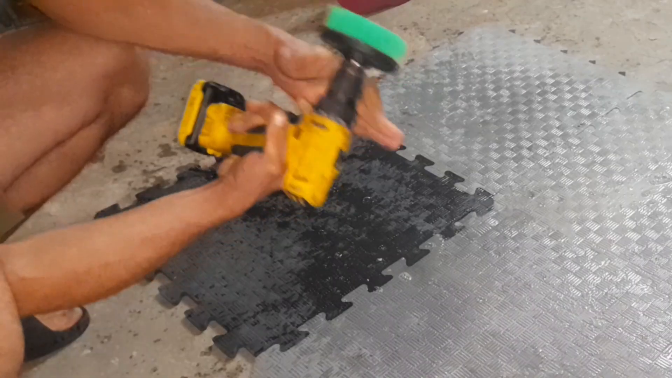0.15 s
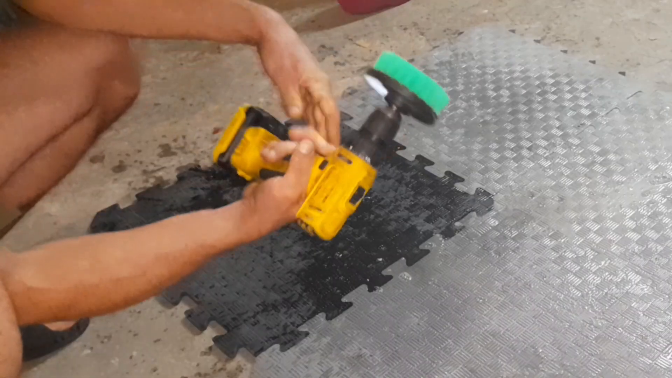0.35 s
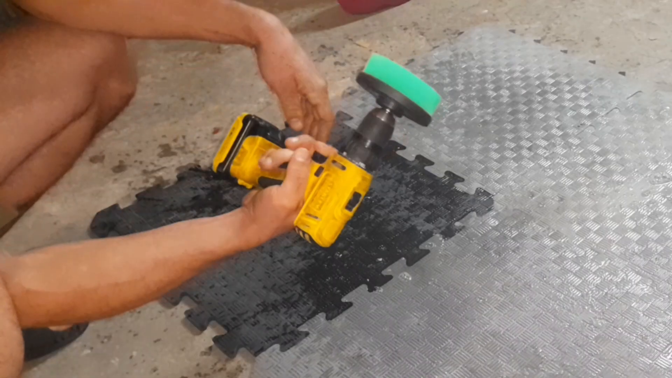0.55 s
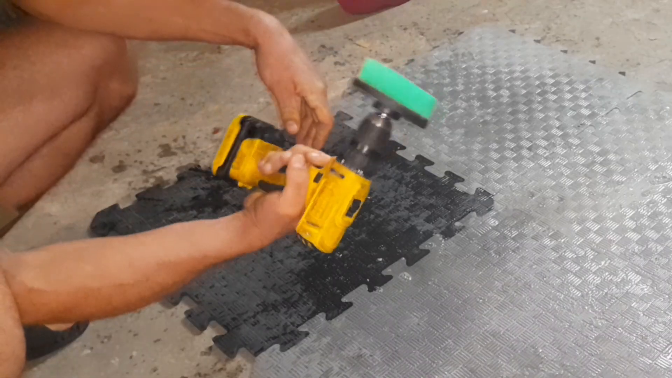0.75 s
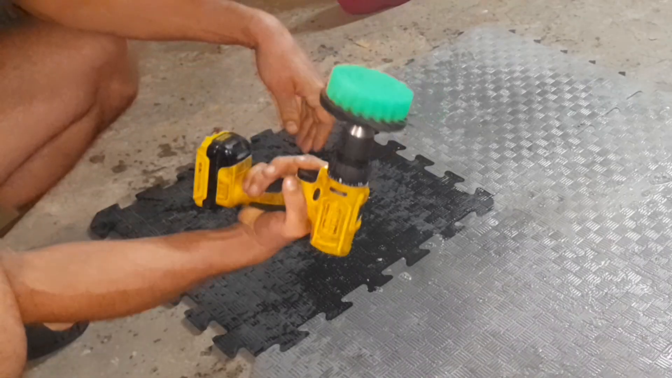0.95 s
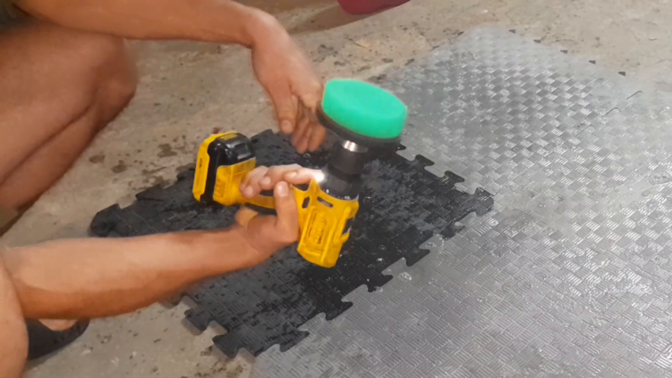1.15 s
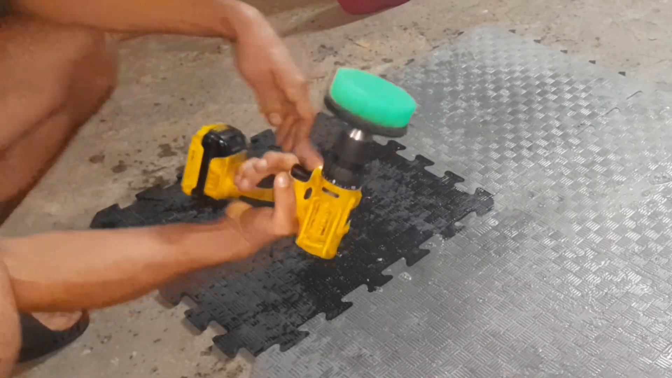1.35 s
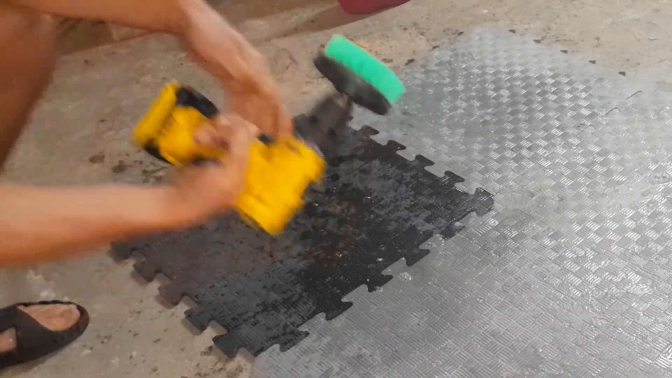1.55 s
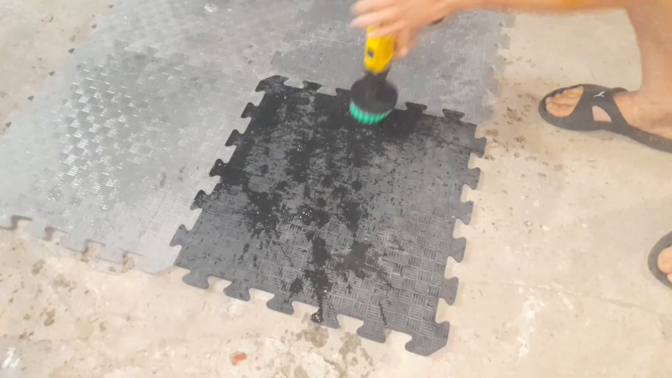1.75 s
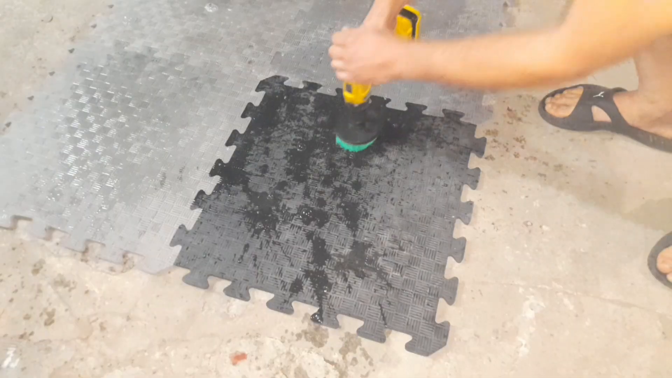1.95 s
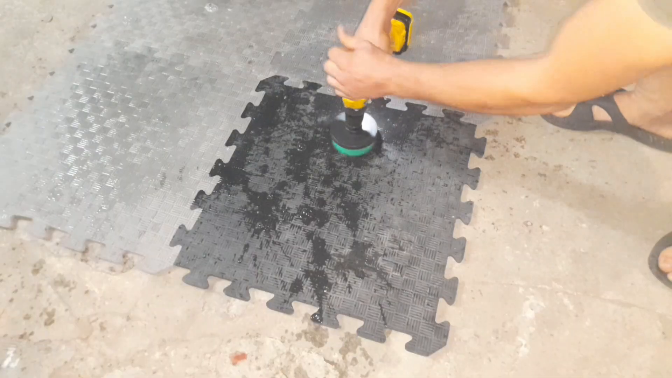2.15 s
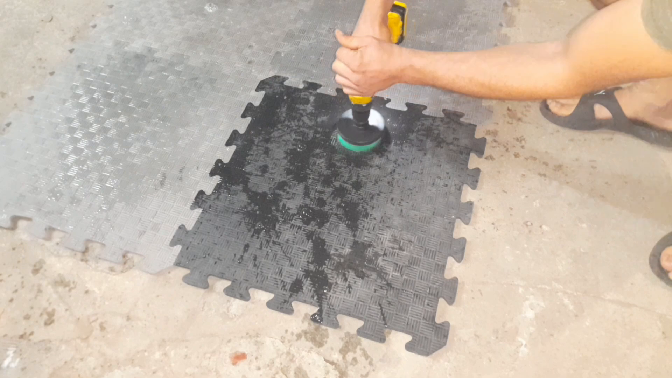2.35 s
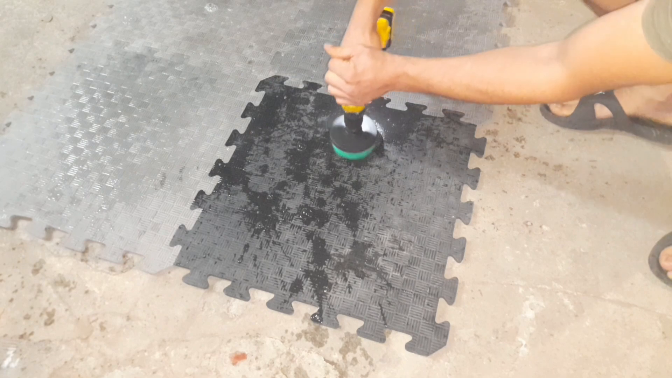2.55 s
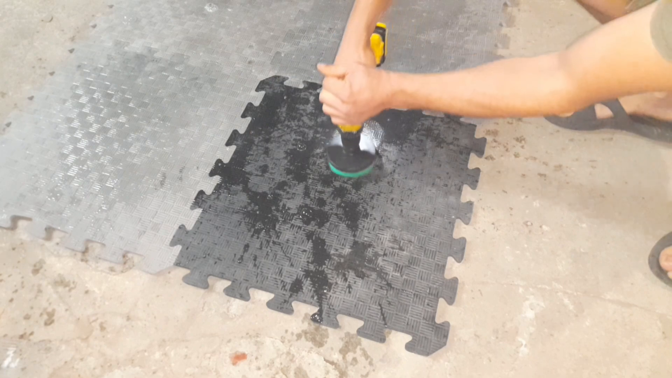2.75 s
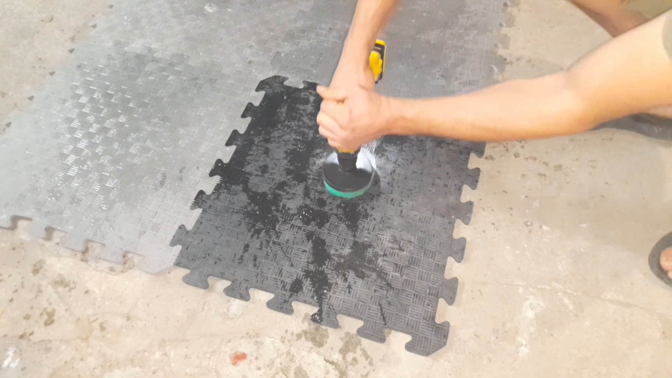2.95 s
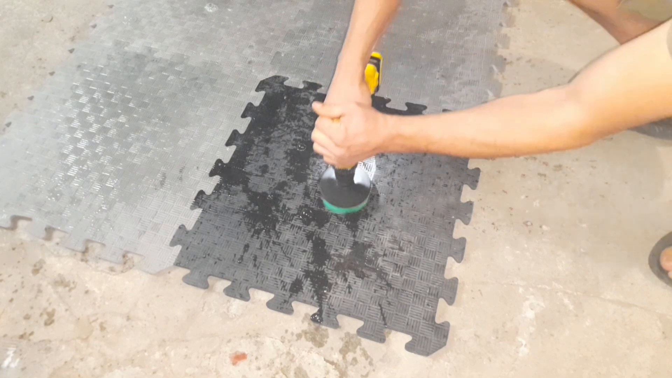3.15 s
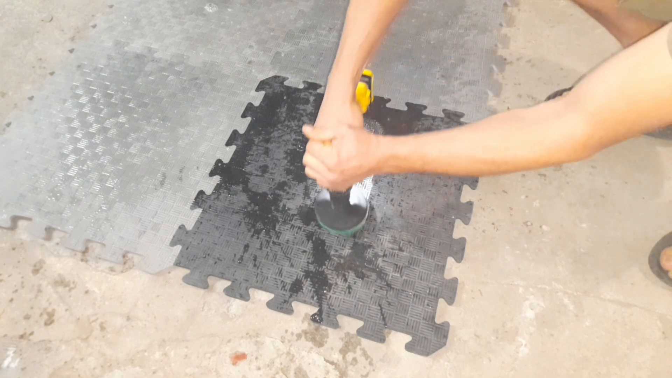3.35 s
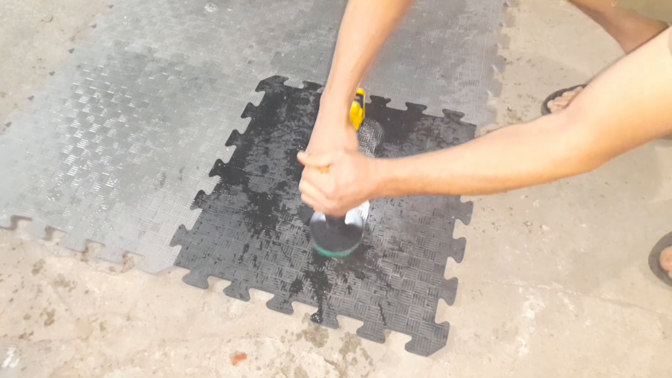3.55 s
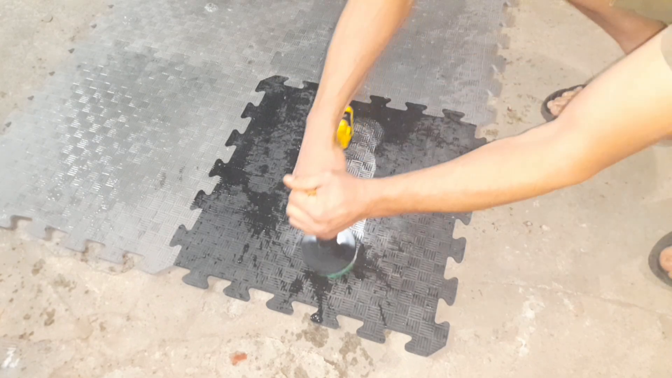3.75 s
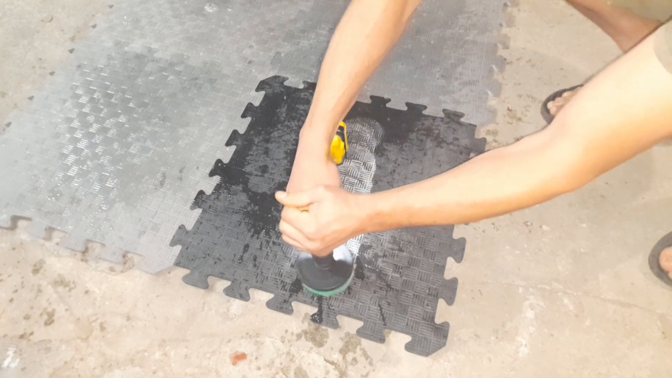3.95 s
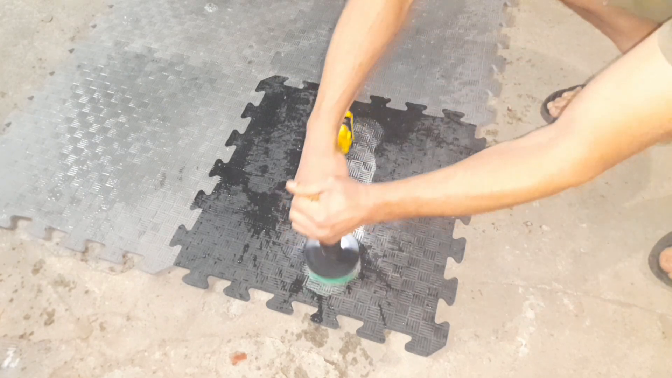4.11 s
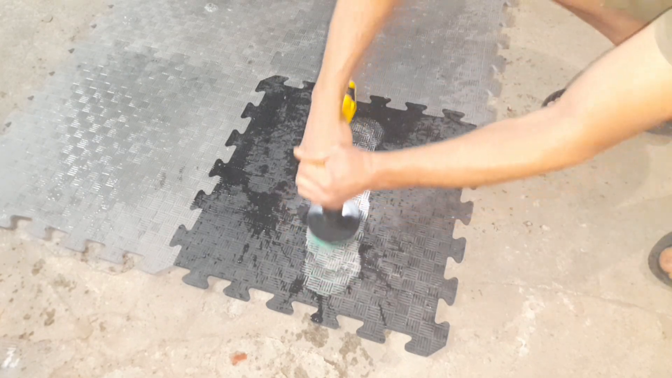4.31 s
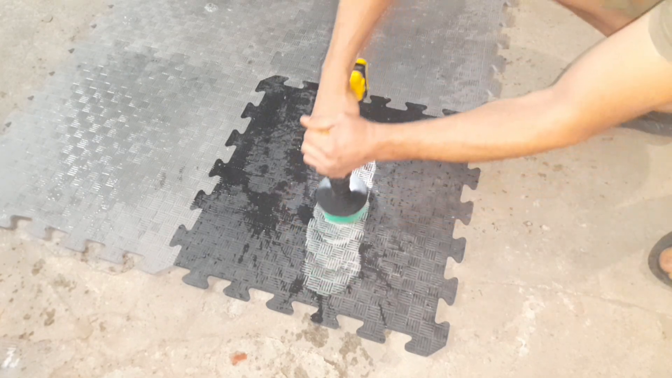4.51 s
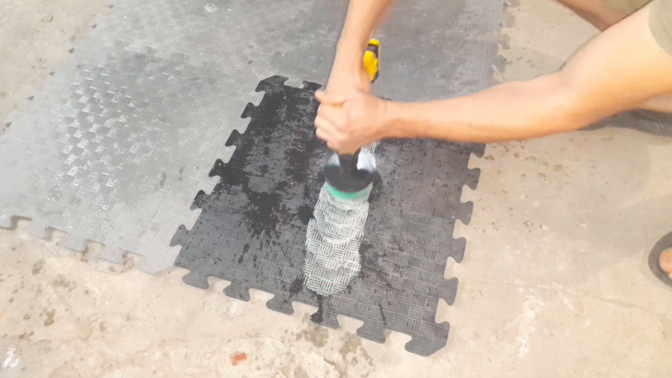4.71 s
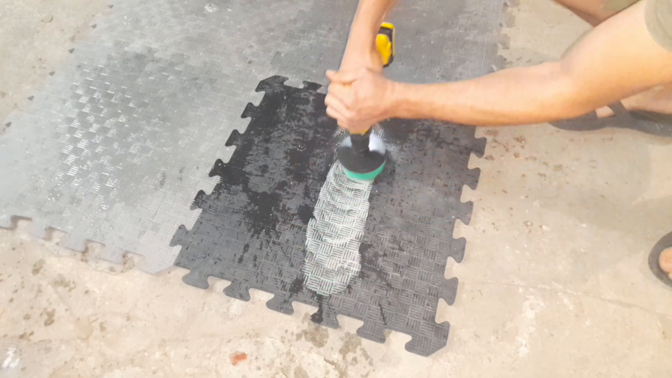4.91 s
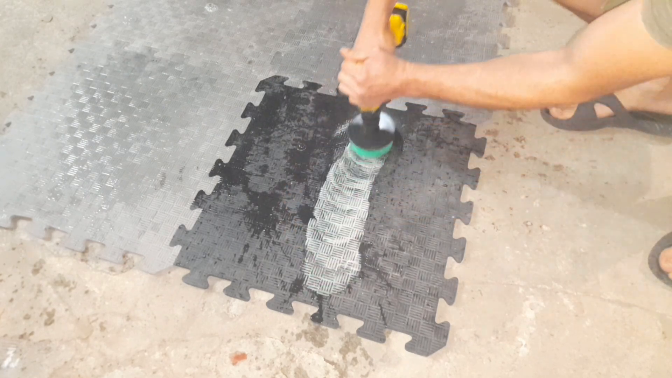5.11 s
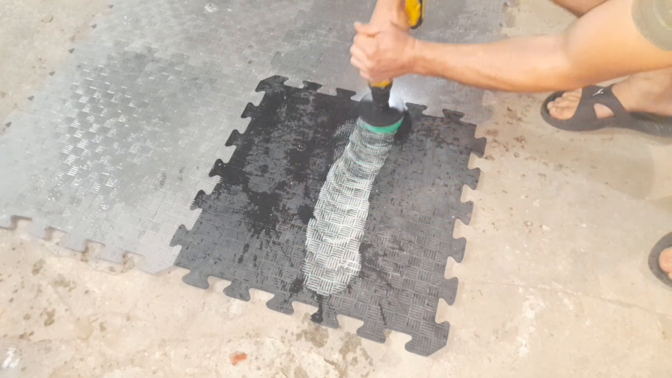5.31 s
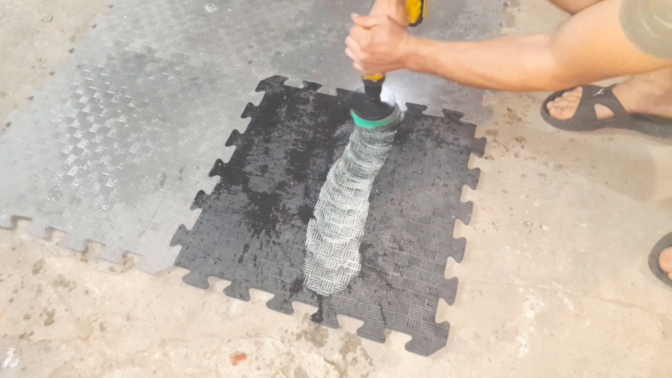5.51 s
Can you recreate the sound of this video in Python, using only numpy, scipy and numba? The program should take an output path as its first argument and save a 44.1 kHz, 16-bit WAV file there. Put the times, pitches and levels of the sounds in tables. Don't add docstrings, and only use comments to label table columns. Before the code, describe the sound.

Close outdoors over low traffic rumble and a faint machine hum, a cordless drill is triggered three times, each a rushing, rising whine ending in hard plastic clacks. An abrupt cut moves the stereo microphone farther off: a drip dies, the brush touches down with a wet rustle and ticks, then scrubs a soapy rubber mat with continuous hiss, uneven rasp and hollow ringing.

```python
import sys
import numpy as np
from scipy import signal
from scipy.fft import rfft, irfft, next_fast_len
from scipy.io import wavfile
from numba import njit

SR = 44100
rng = np.random.default_rng(int(sys.argv[2]) if len(sys.argv) > 2 else 0)


def volts(x):
    e = np.asarray(x, float) / 20
    return 10 ** e


def unload_wav(signal):
    wavfile.write(
        sys.argv[1],
        SR,
        np.round(np.clip(np.atleast_2d(signal).T, -1, 1) * 32767).astype(np.int16),
    )


N = 250047

# time [s], pitch [Hz], level [dB].
LOADED = [(2.2, 395, -72), (2.31, 391, -52), (2.36, 389, -59), (2.41, 334, -57), (2.6, 336, -61.5),
          (2.78, 371, -55.5), (3.0, 384.5, -53), (3.26, 386, -56), (3.5, 362, -68.5), (3.7, 325, -57),
          (3.93, 308, -52), (4.1, 288.5, -62), (4.3, 288, -59), (4.5, 333, -61), (4.76, 328, -57.5),
          (5.0, 313, -57), (5.25, 322, -63), (5.67, 354, -66)]
# time [s], level [dB].
PRESS = [(2.09, -65), (2.16, -30.5), (2.32, -36), (2.56, -31), (2.88, -25), (3.05, -28.5), (3.43, -24.5),
         (3.5, -32), (3.56, -30.5), (3.78, -38), (3.89, -33), (4.22, -37), (4.44, -28.5), (4.49, -22),
         (4.56, -26.5), (4.99, -34), (5.4, -40.5), (5.67, -34)]
# frequency [Hz], level [dB per Hz].
BRISTLES = [(180, -29), (300, -20.5), (328, -15), (349, -25.5), (399, -16.5), (437, -18.5), (508, -20),
            (875, -5.5), (1080, -3.5), (1970, -2), (2790, 0.5), (4800, -3.5), (6020, -2), (9460, -20),
            (11000, -20.5), (14300, -27.5), (22000, -120)]
# frequency [Hz], level [dB per Hz].
FOAM = [(7000, -32), (9500, -23), (11500, -3.5), (13500, 2.5), (15300, -2), (17000, 0)]
# level at usual speed [dB], rise [dB per octave], loss at standstill [dB].
HISS_LAW = (-30.0, 5.1, 21)
SPRAY_LAW = (-35.5, 3.0, 41)
# frequency [Hz], width [Hz], level [dB].
RASP = [(2384, 79, 1), (2540, 31, 13), (2802, 46, 10), (3080, 94, 1), (3330, 68, 8.5), (4240, 180, -8),
        (4900, 180, -11.5), (6150, 280, -19)]
# peak [s], level [dB], rise [s], fall [dB per s].
SNAGS = [
    (2.15, -41, .03, 59),
    (2.72, -24, 0.3, 50),
    (3.43, -31, 0.54, 90),
    (4.15, -28.5, .3, 20),
    (4.76, -29, 0.1, 45),
    (5.15, -23, .04, 170),
]
# start [s], end [s], start [Hz], end [Hz], level [dB].
MAT_RINGS = [(2.52, 2.9, 920, 1370, -41), (2.68, 3.19, 920, 935, -36.5), (2.98, 3.42, 990, 1150, -36),
             (3.3, 3.71, 1280, 1520, -32), (2.66, 3.3, 1510, 2040, -31), (3.11, 3.54, 1790, 2100, -30.5),
             (4.15, 4.45, 995, 1090, -39), (4.44, 4.6, 1050, 1100, -43), (4.55, 4.85, 1030, 1060, -36.5),
             (4.1, 4.896, 1670, 1850, -34), (5.2, 5.58, 2460, 2730, -46.5), (5.3, 5.79, 840, 875, -38),
             (2.12, 2.55, 2850, 2940, -30), (2.47, 2.86, 2700, 3100, -33.5)]
# start [s], release [s], rush [dB], fall while coasting [dB per s].
BLIPS = [
    (0.352, 0.548, -34.5, 70),
    (0.689, 0.894, -34, 128),
    (1.096, 1.31, -34, 140),
]
# multiple of the gear pitch, level [dB].
WHINE = [(1, 3), (1.42, -7), (2, -3), (2.97, -1), (5.6, -1), (7.4, -3)]
# frequency [Hz], level [dB per Hz].
RUSH_COLOUR = [(240, -45), (400, -10), (530, -3.5), (680, -0.5), (950, -3), (1500, 1), (1970, -1.5),
               (2560, -3), (4370, 0.5), (6200, -3.5), (8200, -9.5), (9600, -16.5), (12500, -12.5),
               (17000, -25)]
# frequency [Hz], width [Hz], level [dB].
HOUSING = [(1960, 76, -2.5), (4340, 42, 0), (4570, 37, -21), (5000, 85, -11), (5630, 72, -11),
           (6280, 140, -3)]
# start [s], peak [dB], ring [dB].
CLACKS = [(0.3588, -11, -10), (0.3774, -23, 0), (0.5482, -11.5, 0), (0.562, -19, 0), (0.564, -4, 2),
          (0.58, -18, 4), (0.5874, -16, 0.5), (0.6833, -34, -2), (0.8954, -18, -4), (0.91, -15, 3),
          (0.954, -18.5, 0), (1.1144, -24.5, 3), (1.3109, -18, -4), (1.329, -12, -8), (1.3794, -20, 0)]
# frequency [Hz], level [dB], decay by 60 dB [s].
CLACK_MODES = [(1450, -7, 0.03), (2360, 1, 0.13), (2460, -18, 0.19), (3140, 0, 0.037), (3418, -37.5, 0.19),
               (3600, -5, 0.033), (3800, -14.5, 0.2), (4260, -11, 0.044), (5170, 2, 0.047),
               (6430, 4.5, 0.083), (7585, -23, 0.13), (11000, -18, 0.049)]
# frequency [Hz], level [dB per Hz].
CLACK_COLOUR = [(200, -17), (450, -1.5), (800, -10), (1500, 5), (3000, -10.5), (5500, 2.5), (8000, -11),
                (10000, -22), (13000, -18), (17000, -17.5)]
# left delay [ms], right delay [ms], level [dB].
ECHOES = [(2.9, 3.3, -15), (6.1, 5.2, -15), (9.7, 11.3, -15), (16.3, 14.1, -16)]
# peak [s], level [dB], rise [s], hold [s], fall [dB per s].
SETTLE = [
    (1.976, -45.5, 0.019, 0.038, 500),
    (1.96, -59, 0.041, 0.0073, 300),
    (2.035, -54.5, .04, .08, 302),
    (2.074, -43, .003, 0.0013, 2000),
    (2.103, -43, .002, 0, 1000),
    (2.13, -38, .03, 0.0034, 900),
]
# frequency [Hz], level [dB per Hz].
SETTLE_COLOUR = [(300, -23), (600, -27), (1200, -8.5), (2000, -11.5), (3700, -15), (6500, -19.5),
                 (9500, -39), (13500, -26), (17000, -31.5)]
# peak [s], level [dB], rise [s], hold [s], fall [dB per s].
DRIP_TAIL = [
    (1.62, -49, .003, .022, 300),
    (1.684, -56, .012, 0, 300),
    (1.65, -58, .02, 0, 52),
]
# frequency [Hz], level [dB per Hz].
DRIP_COLOUR = [(150, -13.5), (300, -14), (600, -23), (2500, -28), (6000, -26), (9500, -44), (13500, -34),
               (17000, -45)]
# frequency [Hz], level [dB per Hz].
YARD_NEAR = [(88, -35), (150, -17), (285, -13.5), (320, -18.5), (510, -21.5), (585, -24), (932, -10),
             (1070, -23.5), (1540, -15.5), (1840, -17.5), (2930, -17.5), (5680, -18.5), (9600, -42.5),
             (15600, -35)]
# frequency [Hz], level [dB per Hz].
YARD_FAR = [(88, -34), (150, 7.5), (244, -9.5), (601, -13), (1140, -26), (2920, -56), (5150, -40),
            (9260, -54), (14000, -33), (16000, -62)]
# frequency [Hz], waver [share of the pitch], level [dB rms].
HUM = [(283.7, 0.0026, -49), (958, 0.0032, -53), (494, 0.0061, -61)]
# frequency [Hz], level [dB per Hz].
RUMBLE = [(15, -55), (25, -23), (43, 5), (64, 5), (107, 2), (156, -10), (220, -17), (290, -13.5),
          (480, -120)]
# peak [s], level [dB], rise [s], fall [dB per s].
SWELLS = [(.4, -42, 0.25, 8), (1.36, -40.5, 0.37, 70), (2.16, -45, .08, 25), (2.53, -45, .05, 80),
          (2.72, -50, .04, 32), (4.59, -49, 0.44, 60), (5.57, -43, .07, 90)]
# frequency [Hz], likeness [-1 to 1].
NEAR_LIKENESS = [(60, 0.92), (150, 1), (380, 0.79), (950, -0.24), (2380, -0.086), (5980, -0.034),
                 (15000, 0.14)]
# frequency [Hz], likeness [-1 to 1].
FAR_LIKENESS = [(60, 0.95), (130, 0.9), (290, 0.88), (640, 0.67), (1410, 0.66), (3100, 0.38), (6820, 0.0),
                (15000, 0.03)]
# frequency [Hz], left minus right [dB].
PORTS = [(60, -1.5), (300, -2.5), (3000, -2.5), (4500, -1.5), (6000, -6.5), (7500, 9), (9000, 14.5),
         (10500, -8.5), (12500, -5.5), (15000, -7)]

CHANGE_S, CHANGE_GAP_S, CHANGE_FADE_S = 1.610, 0.009, 0.0015
START_S, SPIN_UP_S, USUAL_HZ = 2.101, 0.069, 350
DRONE_HZ, DRONE_WANDER = 1170, 0.02
RASP_REST_DB = -35.5
SIDEBAND, SIDEBAND_FROM_HZ = 1.08, 370
RING_WIDTH = 0.14
GEAR_HZ, RUN_UP_S, WHINE_DB = 850, 0.065, -47
BITE_S, BITE_DB, EASE_S, EASE_DB = 0.02, -3.5, 0.049, -3.5
BRAKE_S, BRAKE_DB = 0.015, 3
FAN_IDLE_DB, FAN_FULL_DB, FAN_STOP_S = -11, 4.5, 0.021
CRACK_S, RING_S = 0.013, 0.026
YARD_NEAR_DB, YARD_FAR_DB = -42.5, -57.5
RUMBLE_NEAR_DB, RUMBLE_FAR_DB, GUST_DB = -43.5, -49.5, -1.5
LOW_CUT_HZ, HIGH_CUT_HZ = 45, 15850


def scrub():
    motor_hz, motor_db, running = in_time(LOADED)
    drone_db, gate = in_time(PRESS)
    still = np.clip(1 - (np.arange(N) / SR - START_S) / SPIN_UP_S, 0, None) ** 1.44
    hiss_db = brush_level(HISS_LAW, motor_hz, still)
    spray_db = brush_level(SPRAY_LAW, motor_hz, still)
    wobble = volts(0.15 * drift(8.0) + 0.5 * drift(22))
    hiss = coloured(grains(16000, 0.57), BRISTLES, FAR_LIKENESS, patchy_db=-0.47, per_s=6.3)
    hiss = volts(hiss_db + 5.0) * hiss
    spray = coloured(grains(20000, 1.0), FOAM, FAR_LIKENESS, patchy_db=-1.0)
    spray = volts(spray_db + 1.5 + 0.3 * drift(3.0)) * spray

    flicks = spread(grains(7000, 2.4), FAR_LIKENESS)
    rasp = 0
    for hz, width, level_db in RASP:
        rasp = rasp + volts(level_db + 1.6 * drift(1.7)) * resonate(flicks, hz, width)
    rest = volts(RASP_REST_DB + hiss_db - HISS_LAW[0])
    snags = [swell(s, db, rise, 0, fall) for s, db, rise, fall in SNAGS]
    rasp = power_sum([rest] + snags) * volts(-3.5) * rms_one(rasp)

    pressed = volts(drone_db - 3.5) * np.clip((drone_db - hiss_db + 8.0) / 6, 0, 1)
    drone_hz = DRONE_HZ * (1 + DRONE_WANDER * drift(1.2))
    drone = pressed * rms_one(resonate(resonate(flicks, drone_hz, 550), drone_hz, 580))
    brush = hiss + spray + rasp + drone + mat_rings(flicks)
    return gate * wobble * brush + loaded_motor(flicks, motor_hz, motor_db, running)


def brush_level(law, motor_hz, still):
    usual_db, per_octave, loss = law
    return usual_db + per_octave * np.log2(motor_hz / USUAL_HZ) - loss * still - 40 * (still > 1)


def mat_rings(flicks):
    t, out = np.arange(N) / SR, 0
    for start, end, from_hz, to_hz, level_db in MAT_RINGS:
        along = np.clip((t - start) / (end - start), 0, 1)
        hz, width = from_hz + (to_hz - from_hz) * along, RING_WIDTH * to_hz
        ring = rms_one(resonate(resonate(flicks, hz, width), hz, 1.56 * width))
        out = out + volts(level_db) * np.sin(np.pi * along) * ring
    return out


def loaded_motor(flicks, motor_hz, motor_db, running):
    low, high = (rms_one(resonate(resonate(flicks, hz, 6.9), hz, 25))
                 for hz in (motor_hz, SIDEBAND * motor_hz))
    fast = np.clip((motor_hz - SIDEBAND_FROM_HZ) / 15, 0, 1)
    return running * volts(motor_db + 1.5 * drift(4.2)) * (low + high * fast)


def free_spin():
    rush = coloured(grains(24000, 2.0), RUSH_COLOUR, NEAR_LIKENESS, patchy_db=1.5, per_s=77.0)
    rings = sum(volts(level_db) * resonate(rush, hz, width) for hz, width, level_db in HOUSING)
    treble = signal.sosfiltfilt(signal.butter(2, 7000, "high", fs=SR, output="sos"), rush)
    t, whine, power, fan = np.arange(N) / SR, 0, 0, 0
    for start, stop, rush_db, coast in BLIPS:
        speed = 1 - np.exp(-np.clip(t - start, 0, None) / RUN_UP_S)
        braked = stop + BRAKE_S
        shape_db = np.interp(t, [start, start + BITE_S, stop - EASE_S, stop, braked, braked + 1],
                             [-30, BITE_DB, 0, EASE_DB, BRAKE_DB, BRAKE_DB - coast])
        power = power + (t > start) * volts(rush_db + shape_db) ** 2
        fan = np.maximum(fan, np.sqrt(speed) * np.exp(-np.clip(t - stop, 0, None) / FAN_STOP_S))
        turn = 2 * np.pi * np.cumsum(GEAR_HZ * speed * (1 + 0.0089 * drift(60))) / SR
        loud = volts(WHINE_DB) * np.clip(4 * speed - 2.0, 0, 1) * np.clip((stop - t) / 0.012, 0, 1)
        for multiple, line_db in WHINE:
            lag = rng.uniform(0.2, 0.9) * multiple
            line = volts(line_db + 0.88 * np.sqrt(multiple) * drift(25))
            whine = whine + loud * line * np.sin(multiple * turn + [[0], [lag]])
    treble_db = FAN_IDLE_DB + (FAN_FULL_DB - FAN_IDLE_DB) * fan
    body = rush + 1.35 * rings + (volts(treble_db) - 1) * treble
    return whine + np.sqrt(power) * volts(2.0) * body


def clacks():
    t, out = np.arange(3000) / SR, np.zeros((2, N + 3000))
    crack = coloured(rng.standard_normal((2, N)), CLACK_COLOUR, NEAR_LIKENESS, patchy_db=-2.0, per_s=10.0)
    for s, peak_db, ring_db in CLACKS:
        at = round(s * SR)
        blow = crack[:, at:at + 3000] * (volts(-60 * t / CRACK_S) + 0.12 * volts(-60 * t / 0.097))
        for hz, level_db, t60 in CLACK_MODES:
            strength = volts(level_db - 13.5 + ring_db + rng.normal(0, 3.2, (2, 1)))
            swing = np.sin(2 * np.pi * (hz * t + rng.random((2, 1))))
            blow = blow + strength * swing * volts(-60 * t / min(t60, RING_S))
        out[:, at:at + 3000] += volts(peak_db - 6) * blow * (1 - np.exp(-t / 0.00067))
    return out[:, :N]


def echoes(x):
    out = x.copy()
    for left_ms, right_ms, level_db in ECHOES:
        for side, ms in enumerate((left_ms, right_ms)):
            lag = round(ms * SR / 1000)
            out[side, lag:] += volts(level_db) * x[side, :-lag]
    return out


def yard():
    t = np.arange(N) / SR
    before = np.sin(np.pi / 2 * np.clip((CHANGE_S - t) / CHANGE_FADE_S, 0, 1)) ** 2
    after = np.sin(np.pi / 2 * np.clip((t - CHANGE_S - CHANGE_GAP_S) / CHANGE_FADE_S, 0, 1)) ** 2
    near = coloured(rng.standard_normal((2, N)), YARD_NEAR, NEAR_LIKENESS, patchy_db=0.5)
    near = volts(YARD_NEAR_DB + 3) * near + machine_hum()
    far = coloured(rng.standard_normal((2, N)), YARD_FAR, FAR_LIKENESS, patchy_db=1.0)
    far = volts(YARD_FAR_DB) * far + wet_noises(SETTLE, SETTLE_COLOUR) + wet_noises(DRIP_TAIL, DRIP_COLOUR)
    return before * near + after * far + (before + after) * low_rumble()


def wet_noises(events, colour):
    gain = power_sum([swell(*row) for row in events])
    return gain * volts(2.0) * coloured(grains(9000, 1.3), colour, FAR_LIKENESS, patchy_db=0.5)


def machine_hum():
    out = 0
    for hz, waver, level_db in HUM:
        turn = 2 * np.pi * np.cumsum(hz * (1 + waver * drift(10.8))) / SR
        out = out + volts(level_db + 1.0 + 0.5 * drift(10.0)) * np.sin(turn)
    return out


def low_rumble():
    t = np.arange(N) / SR
    steady = volts(np.where(t < CHANGE_S, RUMBLE_NEAR_DB, RUMBLE_FAR_DB) + GUST_DB * drift(2.7))
    gain = power_sum([steady] + [swell(s, db, rise, 0, fall) for s, db, rise, fall in SWELLS])
    return gain * coloured(rng.standard_normal((2, N)), RUMBLE, FAR_LIKENESS, patchy_db=-2.2)


def swell(at, level_db, rise, hold, fall):
    t = np.arange(N) / SR - at
    return volts(level_db - fall * np.clip(t - hold, 0, None)) * np.clip(1 + t / rise, 0, 1) ** 2


def power_sum(gains):
    return np.sqrt(sum(g ** 2 for g in gains))


def rms_one(x):
    return x / np.sqrt(np.mean(x ** 2) + 1e-20)


def in_time(rows, fade=0.0077):
    s, *columns = np.transpose(rows)
    t = np.arange(N) / SR
    gate = np.clip(np.minimum(t - s[0], s[-1] + fade - t) / fade, 0, 1)
    return [np.interp(t, s, c) for c in columns] + [gate]


def at_hz(points, hz):
    table_hz, values = np.transpose(points)
    return np.interp(np.log(hz + 1), np.log(table_hz), values)


def drift(rate):
    r = np.exp(-64 * np.pi * rate / SR)
    noise = rng.standard_normal(N // 32 + 2002)
    slow = signal.lfilter([1], [1, -2 * r, r * r], noise)[2000:]
    return np.interp(np.arange(N) / 32, np.arange(len(slow)), rms_one(slow))


def grains(per_s, spread_db):
    size = volts(spread_db * np.minimum(rng.exponential(1, (2, N)), 4)) * rng.standard_normal((2, N))
    return rms_one(size * (rng.random((2, N)) < per_s / SR))


def stereo(pair, likeness):
    size = next_fast_len(N)
    mid, side = rfft(pair, size)
    alike = np.clip(at_hz(likeness, np.arange(len(mid)) * SR / size), -1, 1)
    return np.sqrt(1 + alike) * mid + np.sqrt(1 - alike) * side * [[1], [-1]], size


def spread(pair, likeness):
    sides, size = stereo(pair, likeness)
    return irfft(sides, size)[:, :N]


def coloured(pair, spectrum, likeness, patchy_db, per_s=22.0):
    sides, size = stereo(pair, likeness)
    hz = np.arange(sides.shape[1]) * SR / size
    place, out = 2 * np.log2(hz / 20 + 1e-9), 0
    sides = sides * volts(at_hz(spectrum, np.minimum(hz, 15300)))
    lowest = int(2 * np.log2(spectrum[0][0] / 20))
    highest = int(2 * np.log2(spectrum[-1][0] / 20)) + 1
    for k in range(lowest, highest + 1):
        band = np.cos(np.pi / 2 * np.clip(place - k, -1, 1)) ** 2
        out = out + volts(patchy_db * drift(per_s)) * irfft(sides * band, size)[:, :N]
    return rms_one(out)


@njit
def sweep(x, hz, r, step):
    out = np.zeros_like(x)
    for i in range(2, len(x)):
        out[i] = x[i] - x[i - 2] + 2 * r * np.cos(step * hz[i]) * out[i - 1] - r * r * out[i - 2]
    return out


def resonate(x, hz, width):
    r = np.exp(-np.pi * width / SR)
    return np.array([sweep(c, hz + np.zeros(N), r, 2 * np.pi / SR) for c in x]) * (1 - r * r) / 2


def scene():
    close = np.arange(N) / SR < CHANGE_S
    return yard() + close * (free_spin() + clacks()) + echoes(scrub())


def band_limit(x):
    return signal.sosfilt(signal.butter(12, 16310, fs=SR, output="sos"), x)


def record(dry):
    size = next_fast_len(N)
    hz = np.arange(size // 2 + 1) * SR / size
    ports = volts(at_hz(PORTS, hz) / 2 * [[1], [-1]])
    gain = ports * (hz < HIGH_CUT_HZ) / np.sqrt(1 + (LOW_CUT_HZ / (hz + 1)) ** 8)
    since = np.arange(N) / SR - CHANGE_S
    gap = np.clip(np.maximum(-since, since - CHANGE_GAP_S) / CHANGE_FADE_S, 0.02, 1)
    mix = gap * irfft(rfft(dry, size) * gain, size)[:, :N]
    return band_limit(mix)


dry = scene()
out = record(dry)
unload_wav(out)
```